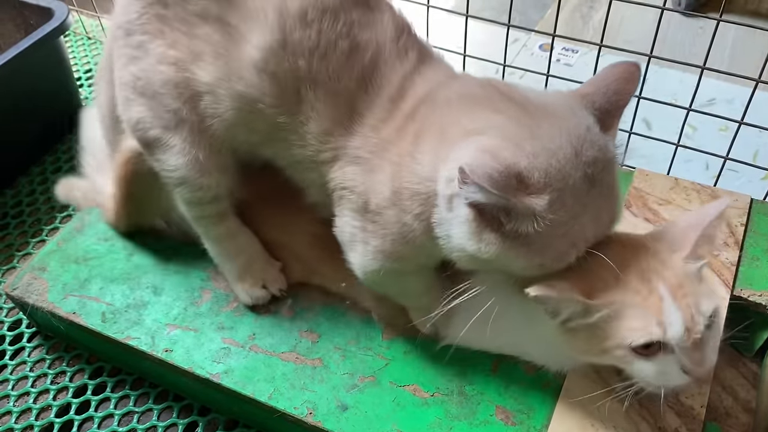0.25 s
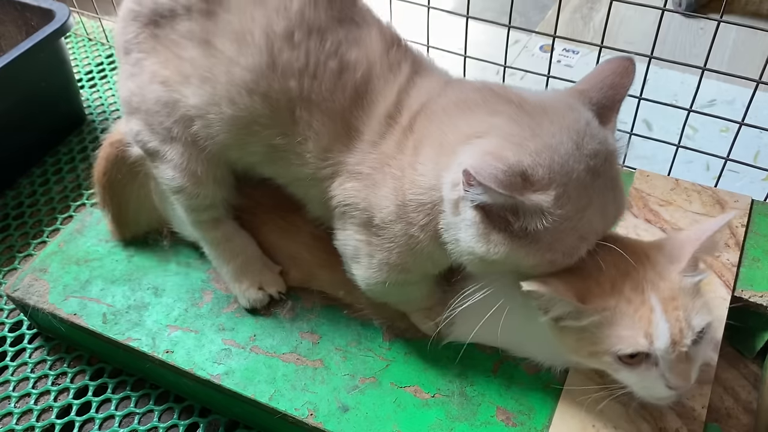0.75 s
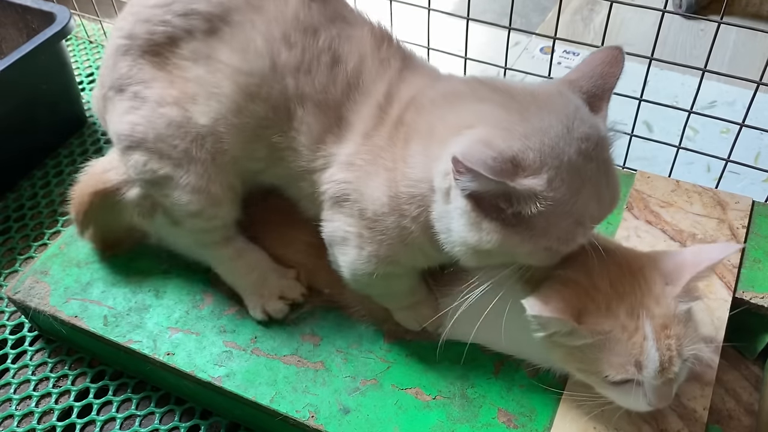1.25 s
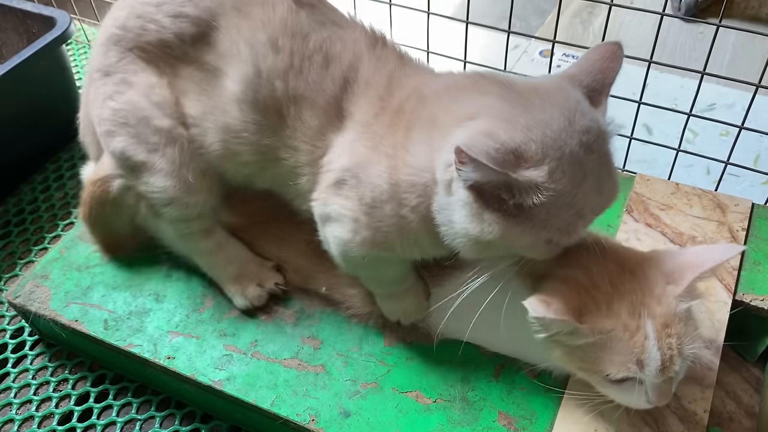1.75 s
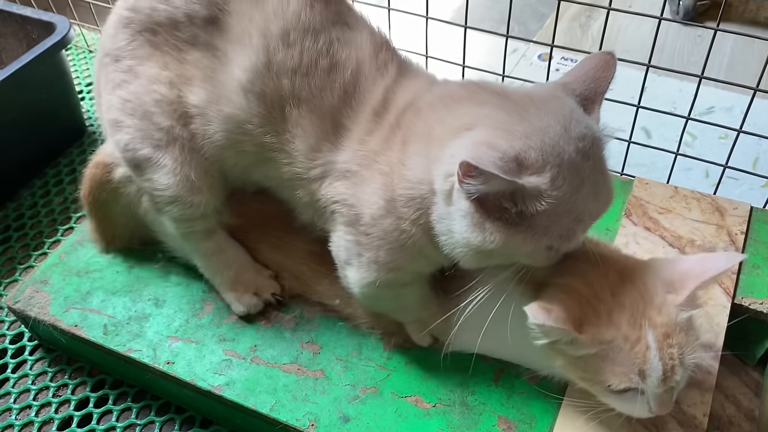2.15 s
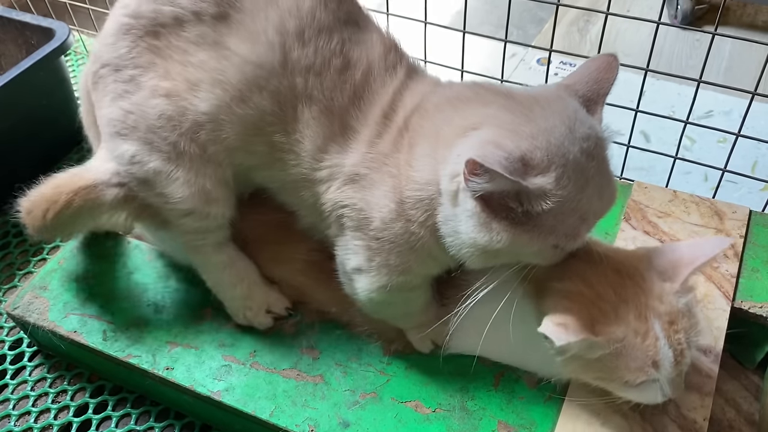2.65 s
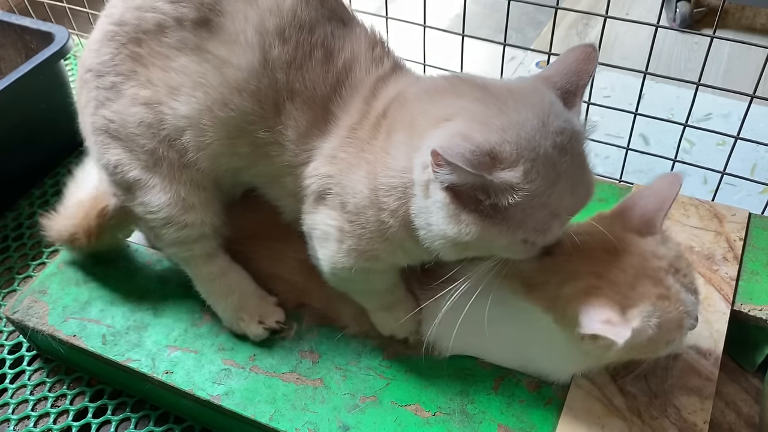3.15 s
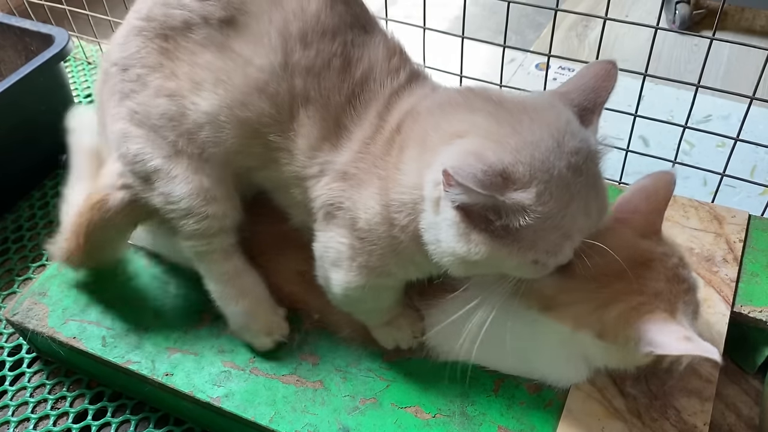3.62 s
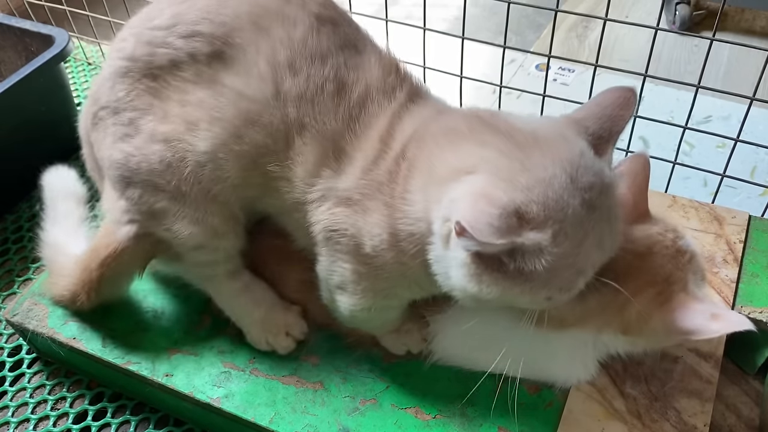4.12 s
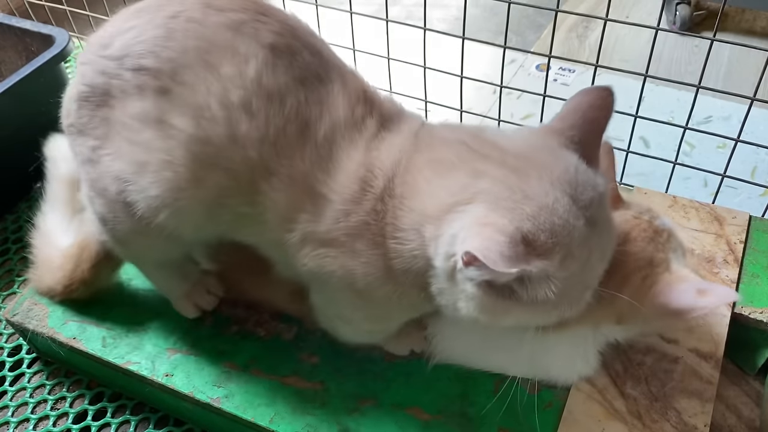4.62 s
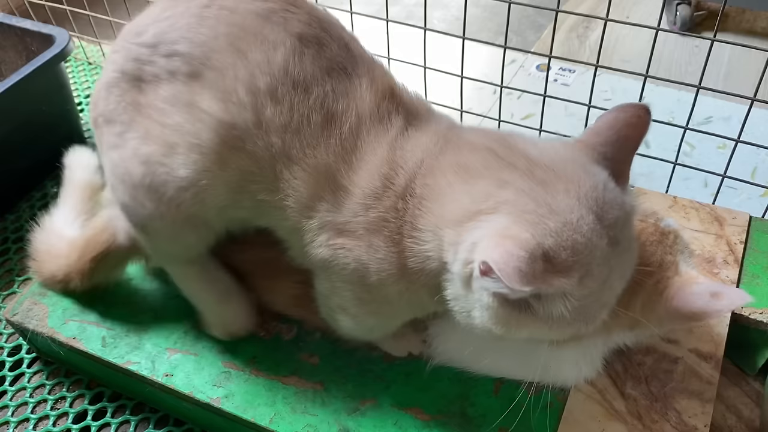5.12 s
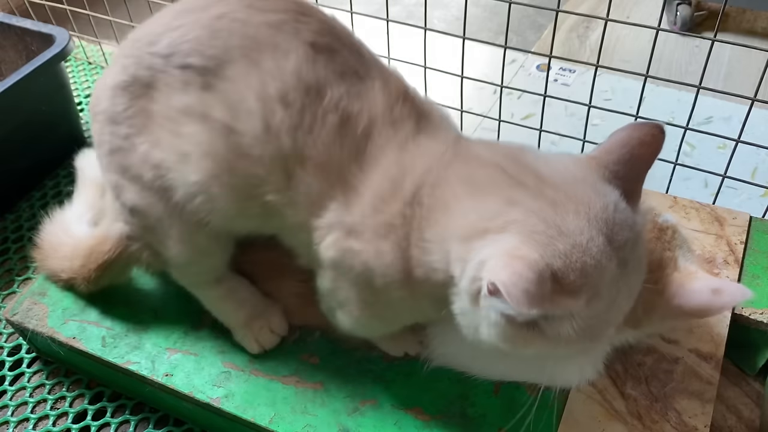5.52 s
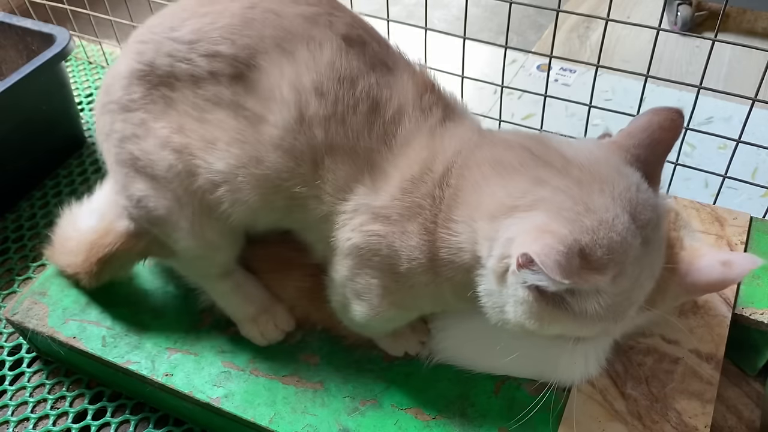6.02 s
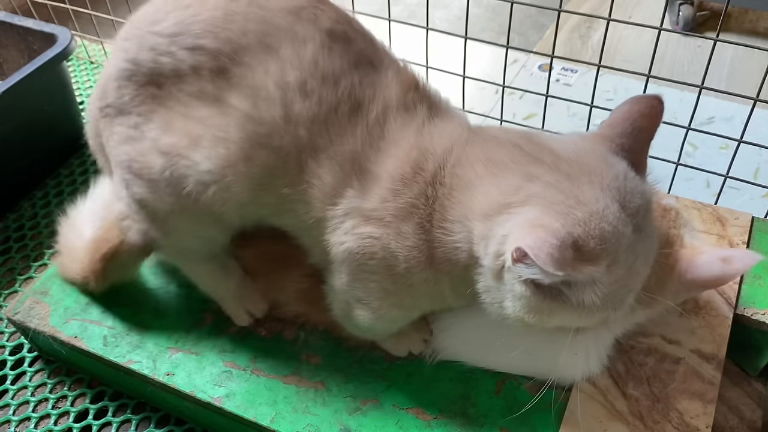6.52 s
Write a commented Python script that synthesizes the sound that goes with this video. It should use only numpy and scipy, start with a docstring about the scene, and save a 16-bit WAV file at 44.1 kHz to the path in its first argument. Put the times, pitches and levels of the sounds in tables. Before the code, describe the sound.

Close cat yowl cracks and falls, followed by a rough two-part cry, quiet rattling trills, claw clicks on board, moan and growl over low hum.

```python
"""Two cats in a wire cage

Two cats on a board, close to a phone with a microphone at each end. A yowl, a trill, a hoarse
double cry, another trill, and later a moan and a growl: pulses and breath through throat resonances.
Claws tick and drag as short noise bursts, and a faint squeak is narrow noise.
The room adds an echo made of sparse taps, shaped air noise and three fuzzy low tones.
"""
import sys
import numpy as np
from scipy import signal
from scipy.fft import rfft, irfft, next_fast_len
from scipy.io import wavfile
from scipy.ndimage import uniform_filter1d

SR = 44100
rng = np.random.default_rng(int(sys.argv[2]) if len(sys.argv) > 2 else 0)


def to_wav(s):
    """Save 16-bit WAV."""
    ch = np.atleast_2d(s).T  # columns
    pcm = np.round(np.clip(ch, -1, 1) * 32767)  # PCM
    wavfile.write(sys.argv[1], SR, pcm.astype(np.int16))


N = 298557  # length [samples]

# Color of the air noise: (frequency [Hz], relative level per Hz [dB])
AIR_COLOR = [(24, -53), (33, -23), (50, 3.5), (90, -3), (125, -3), (200, -6), (400, -14), (1000, -18),
             (2000, -22.5), (4000, -31), (5300, -31.5), (7000, -38.5), (11000, -42), (16000, -48)]
AIR_DB = -42
# Stereo shape of the hiss, whose bands alternate between in-phase and opposed channels:
# (frequency [Hz], strength of the alternation before a limit of 0.98 [factor])
AIR_STEREO = [(100, 0.92), (400, 0.89), (1000, 0.2), (2000, 0.067), (4000, 0.25), (5500, 0.048),
              (7000, 1.15), (16000, 4.5)]
STEREO_CYCLE_S = 0.0002768  # the bands repeat every 1 / this many Hz
# Low hum tones: (frequency [Hz], width [Hz], relative level [dB])
HUM_TONES = [(58.3, 4.4, -21), (85.3, 6.8, 1.5), (99.9, 12.3, -6.5)]
# Level of the low hum over time: (time [s], level [dB])
HUM_LEVEL = [(0.0, -38), (0.51, -50), (1.21, -42.5), (1.7, -51), (2.4, -45.5), (4.5, -45.5), (5.0, -43.5),
             (5.62, -43), (6.77, -39.5)]
# How long the echo rings, never under 0.05 s: (frequency [Hz], time to fall 60 dB [s])
ECHO_TIME = [(200, 0.77), (1000, 0.51), (2200, 0.67), (3600, 0.57), (6000, 0.54), (12000, 0.043)]
# How far the left microphone leads for nearby sounds: (frequency [Hz], phase lead [rad])
LEFT_LEAD = [(100, 0.012), (520, 0.41), (1030, 0.65), (1550, 1.1), (2070, 1.16), (2750, 0.56), (4500, 0.17),
             (5500, 3.6), (7400, 6.6), (9000, 11.9), (11000, 11), (13100, 16), (15000, 18.5)]
# How much louder the left microphone is: (frequency [Hz], left over right [dB])
LEFT_TILT = [(200, 0.5), (520, -3.5), (1030, 0), (1550, 1.5), (2500, -0.5), (4300, 3.5), (6000, 10),
             (7500, 0)]
EDGE_HZ = 15900  # top of the band
WIRE_HZ, WIRE_WIDTH_HZ, WIRE_DB = 2110, 16, -28  # one ring of the cage wire

SQUEAK_S, SQUEAK_LENGTH_S, SQUEAK_DB = 4.91, .2, -70
SQUEAK_HZ, SQUEAK_WIDTH_HZ = (4270, 4850), 220
# Claw drags: (start [s], rise [s], fall [s], ring [Hz], width [Hz], level [dB])
CLAW_DRAGS = [(.592, 0.014, 0.022, 6780, 1500, -46.5), (.612, 0.0081, 0.013, 4750, 716, -52),
              (0.643, 0.002, 0.0043, 5100, 1110, -47)]
# Claw ticks: (time [s], scratch gain [dB], gain on the board's knock [dB])
CLAW_TICKS = [(2.302, -48.5, -44), (2.59, -51, -55), (2.67, -46.5, -63), (3.42, -51.5, -68),
              (3.721, -38.5, -58), (3.7425, -40.5, -62), (3.7535, -50, -54), (4.5163, -35.5, -36),
              (4.5232, -42, -45), (4.5346, -36, -36), (4.617, -52, -50), (4.767, -41.5, -52),
              (4.7744, -45, -48), (4.788, -39, -62), (5.104, -52, -52), (6.2298, -50, -47)]
# Color of the scratch: (frequency [Hz], relative level per Hz [dB])
CLAW_COLOR = [(300, -22), (2000, -5), (3900, -3), (4450, -2.5), (5200, -2.5), (6300, -0.5), (6950, 1.5),
              (7700, -4), (10000, -9), (16000, -20)]
# Ringing tones of the board: (frequency [Hz], relative level [dB], time to fall 60 dB [s])
BOARD_TONES = [(472, 5.5, 0.069), (710, 0.5, 0.038), (1050, -7, 0.04), (1640, -3, 0.03), (2170, -5, 0.033),
               (2700, -10, 0.027)]

# Throat shapes, one resonance a row: (frequency [Hz], width [Hz], relative level [dB])
WIDE_THROAT = [(480, 170, -11), (1193, 290, -2), (1680, 430, 2), (2120, 230, 9.5), (2793, 62, -8),
               (3980, 520, -3.5), (4416, 370, -9.5), (4970, 780, -13.5), (5880, 300, -27),
               (7540, 1600, -22.5), (10540, 600, -14), (13900, 2900, -30)]
TIGHT_THROAT = [(260, 180, -5), (524, 140, -3), (1157, 360, 1), (1350, 230, 3), (1580, 184, 7),
                (2690, 470, -10.5), (3020, 260, -8.5), (7500, 470, -23), (11900, 830, -31)]
HOARSE_THROAT = [(522, 230, -5), (865, 77, -9), (1142, 380, 1), (1680, 330, -2), (2360, 320, -10.5),
                 (3940, 89, -23.5), (7470, 350, -32.5), (12260, 1300, -40)]
SHUT_THROAT = [(297, 180, 0), (523, 110, 9), (1045, 140, 2.5), (1340, 120, -2), (1660, 150, -11.5)]
DEEP_THROAT = [(162, 112, 1.5), (234, 61, 1.5), (344, 88, -2), (446, 50, 1.5), (517, 108, 2),
               (1050, 293, -9), (1620, 300, -16)]
PINCHED_THROAT = [(882, 130, -0.5), (1460, 110, -3), (2110, 180, -8)]
NASAL_THROAT = [(752, 52, -3.5), (881, 69, 11), (1520, 37, -12), (2020, 780, -6), (2350, 240, -22)]
# Chest resonances that keep the cry's lowest overtones clear:
# (frequency [Hz], width [Hz], relative level [dB])
CHEST = [(262, 320, -0.5), (483, 370, -1)]
CHEST_DB = -45.5  # at full effort
STRAIN_HZ = 2700  # resonances above this follow the strain
SHEEN_BAND_HZ = (6600, 9000)  # resonances here follow the sheen instead
SQUEAL_BAND_HZ = (4200, 6000)  # resonances at the back of the throat that can flare

# Growl: (time [s], pulse rate [pulses/s], effort [dB], roughness [0-1], mouth opening [factor])
GROWL = [(5.76, 75, -56, .15, .92), (5.8, 75, -44.5, .12, .99), (5.95, 74.5, -44.5, .12, 1),
         (6.05, 73, -46, .3, 1), (6.2, 73.4, -44, .4, 1.05), (6.34, 69, -46.5, .25, .97),
         (6.5, 71.3, -43, .2, 1), (6.6, 73, -43, .22, .98), (6.77, 76, -43.5, .3, .94)]
# Moan: (time [s], pitch [Hz], effort [dB])
MOAN = [(5.1, 265.7, -73), (5.18, 261.7, -44), (5.25, 271.3, -60), (5.3, 279.8, -46), (5.38, 303.5, -43.5),
        (5.45, 325.4, -42), (5.5, 304.7, -43), (5.58, 290.4, -41.5), (5.635, 271.5, -44.5),
        (5.67, 294.8, -45), (5.75, 289.6, -46), (5.8, 260, -68)]
# Two trills: (time [s], pulse rate [pulses/s], effort [dB], mouth opening [factor])
TRILLS = [
    [(1.36, 24, -57, 0.99), (1.45, 23, -48, 0.96), (1.7, 20, -54, 0.98)],
    [(2.3, 31, -55, 1), (2.37, 32, -48.5, 0.97), (2.46, 32.3, -45.5, 1), (2.495, 29.6, -51, 1),
     (2.54, 28.6, -42.5, 1.035), (2.575, 32, -45.5, 0.99), (2.612, 27, -53, 0.95), (2.65, 29, -46.5, 0.994),
     (2.755, 27, -50, 0.98), (2.785, 29, -54, 0.91), (2.87, 22.4, -51, 0.93), (3.05, 29, -59, 0.96)],
]
# Double cry, first half: (time [s], pitch [Hz], effort [dB], mouth opening [factor])
RASP = [(1.65, 271, -56, 0.74), (1.682, 256.4, -42, 0.77), (1.688, 251, -40, 0.87),
        (1.704, 245.2, -32.5, 0.91), (1.722, 238.7, -31.5, 0.99), (1.75, 260.3, -31, 0.98),
        (1.78, 288.3, -28.5, 1.03), (1.793, 287, -31.5, 0.97), (1.81, 286.6, -34.5, 0.97),
        (1.82, 290.4, -38, 1.02), (1.85, 304, -42, 1.03)]
# Double cry, second half: (time [s], pitch [Hz], effort [dB], mouth opening [factor])
CRY = [(1.84, 286.4, -43, .8), (1.88, 293.2, -37, 1), (1.95, 299, -32.5, 0.99), (2.02, 282.3, -33, 0.95),
       (2.05, 292.7, -34, 1.07), (2.09, 270.6, -32.5, 0.93), (2.125, 229.8, -38.5, 0.84),
       (2.16, 223, -41, 1), (2.25, 214.2, -40.5, 0.98), (2.32, 204, -61, 0.75)]
# Yowl: (time [s], pitch [Hz], effort [dB], roughness [0-1], mouth opening [factor],
# strain of the upper throat [dB], sheen near 7 kHz [dB])
YOWL = [(0, 439, -27.5, 0.33, 0.73, 1, -6), (.03, 486.6, -33.5, 0.1, 0.88, -8, -2),
        (.055, 522, -24, 0.09, 0.89, -4, -7), (.08, 519.3, -20, 0.08, 0.88, -0.5, -1.5),
        (.1, 530.2, -20, 0.06, 0.98, -5, -4), (.15, 543.7, -20.5, 0.05, 0.98, 4.5, 8),
        (.19, 558.7, -18, 0.06, .99, 5.5, 4.5), (.24, 576.5, -19, 0.05, 1, 7.5, 2),
        (.262, 567, -18, 0.07, 0.98, 4.5, 1), (.28, 555, -18, 0.04, 0.98, 2, 0.5),
        (.32, 531, -17, 0.04, 0.99, 0.5, -9), (.355, 516.7, -19, 0, 0.938, -8, -4),
        (.375, 497, -22, .05, 0.94, -2, 0), (.445, 456.6, -27, 0.08, 0.865, -5, 2),
        (.472, 415, -38, 0.1, 0.67, -34, -10), (.492, 372.8, -28, .15, 0.55, -11, -13),
        (.52, 304, -35.5, 0.25, 0.5, -14, -12), (.58, 248.6, -55, 0.12, .46, -18, -12)]
# Cracks in the yowl: (time [s], pitch loss before shaping [share], depth of the dip [dB])
CRACKS = [(.094, -.017, -3), (.195, .045, -6), (.219, .034, -2.5), (.24, .042, -2.5), (.253, .034, -6),
          (.292, .02, -1.5)]
CRACK_S, RECOVER_S, DIP_S = .002, .016, .004  # time constants: pitch slips, pitch returns, level dips
SQUEAL_S, SQUEAL_LENGTH_S, SQUEAL_DB = 0.337, .013, 13  # a short flare as the yowl starts down
FLARE_S, FLARE_LENGTH_S, FLARE_DB = .232, .04, 6  # a broader swell over the top of the yowl
PAIRED_S = (.196, .27)  # span where long and short cycles alternate most
FLUTTER_DB = .28  # each overtone wavers on its own, by this times its number


def amp(db):
    """Turns decibels into a gain."""
    return 10 ** (np.asarray(db) / 20)


def evened(x):
    """Scales a sound to an rms (average strength) of 1."""
    return x / np.sqrt(np.mean(x ** 2) + 1e-20)


def read_spectrum(points, hz):
    """Reads a (frequency, value) table, with straight lines on a log frequency axis."""
    f, value = np.transpose(points)
    return np.interp(np.log(hz + 1), np.log(f + 1), value)


def curves(rows):
    """Gives the time axis and the columns of a table, joined by straight lines."""
    s, *columns = np.transpose(rows)
    t = np.arange(s[0], s[-1], 1 / SR)
    return t, *(np.interp(t, s, c) for c in columns)


def add(mix, s, sound):
    """Mixes a sound in at s seconds."""
    part = mix[round(s * SR):][:len(sound)]
    part += sound[:len(part)]


def resonate(x, hz, width):
    """Shifts the frequency hz to zero, smooths twice, shifts back: a steep resonance of gain 1."""
    turn = np.exp(2j * np.pi * np.cumsum(hz * np.ones(len(x))) / SR)
    r = np.exp(-np.pi * width / SR)
    smooth = signal.lfilter([(1 - r) ** 2], [1, -2 * r, r * r], x / turn + 1e-18)
    return 2 * (turn * smooth).real


def pair(a, b, same):
    """Makes two channels from two unrelated spectra: same = 1 is in phase, -1 is opposed."""
    mid, side = np.sqrt((1 + same) / 2) * a, np.sqrt((1 - same) / 2) * b
    return np.array([mid + side, mid - side])


def air():
    """Steady colored room noise in stereo, with faint drifting patches."""
    f = np.fft.rfftfreq(N, 1 / SR)
    # plain stereo shaping: in-phase and opposed bands alternate, strongest in the treble
    same = np.clip(read_spectrum(AIR_STEREO, f) * np.cos(2 * np.pi * f * STEREO_CYCLE_S), -.98, .98)
    spectra = pair(*rfft(rng.standard_normal((2, N))), same)
    noise = irfft(spectra * amp(read_spectrum(AIR_COLOR, f)), N)
    # smooth random levels over time and frequency
    patches = rng.standard_normal((N // 128 + 5, 257))
    patches = uniform_filter1d(patches, size=20, axis=0)
    patches = evened(uniform_filter1d(patches, size=8, axis=1)).T
    z = signal.stft(noise, nperseg=512, noverlap=384)[2]
    z = z * amp(1.2 * patches[:, :z.shape[2]])
    return amp(AIR_DB) * evened(signal.istft(z, nperseg=512, noverlap=384)[1][:, :N])


def hum():
    """Low room hum: noise through narrow resonances gives three fuzzy tones that waver at random."""
    tones = sum(amp(db) * evened(resonate(rng.standard_normal(N), hz, w)) for hz, w, db in HUM_TONES)
    s, db = np.transpose(HUM_LEVEL)
    return amp(np.interp(np.arange(N) / SR, s, db)) * evened(tones)


def room(x):
    """Echoes as sparse taps of random sign, each frequency band dying at its own speed."""
    taps = np.zeros((2, SR))
    at = np.arange(400, SR - 20, 20) + rng.integers(0, 20, (2, (SR - 401) // 20))
    np.put_along_axis(taps, at, rng.choice([-1., 1.], at.shape), 1)
    hz, t, z = signal.stft(taps, SR, nperseg=256)
    t60 = np.maximum(read_spectrum(ECHO_TIME, hz), .05)
    tail = signal.istft(z * amp(-60 * t / t60[:, None]), SR, nperseg=256)[1]
    return signal.fftconvolve(x[None], tail / np.linalg.norm(tail[0]), axes=1)[:, :N]


def ports(x):
    """Direct sound at the two microphones: half the lead and half the tilt goes to each."""
    size = next_fast_len(N + 4096)
    hz = np.fft.rfftfreq(size, 1 / SR)
    half = np.exp(.5j * read_spectrum(LEFT_LEAD, hz)) * amp(.5 * read_spectrum(LEFT_TILT, hz))
    return irfft(rfft(x, size) * np.array([half, 1 / half]), size)[:, :N]


def squeak():
    """A faint thin squeak: two fuzzy high whistles of narrow noise swell and fade together."""
    noise = rng.standard_normal(round(SQUEAK_LENGTH_S * SR))
    tones = sum(evened(resonate(noise, hz, SQUEAK_WIDTH_HZ)) for hz in SQUEAK_HZ)
    out = np.zeros(N)
    add(out, SQUEAK_S, amp(SQUEAK_DB) * tones * signal.windows.tukey(len(noise), .5))
    return out


def scrapes():
    """A claw drags over the board: noise swells in one resonance and dies."""
    out, t = np.zeros(N), np.arange(4096) / SR
    for s, rise, fall, hz, width, db in CLAW_DRAGS:
        noise = rng.standard_normal(4096)
        shape = np.minimum(t / rise, 1) ** 2 * np.exp(-np.maximum(t - rise, 0) / fall)
        add(out, s, amp(db) * shape * evened(resonate(noise, hz, width)))
    return out


def claws():
    """Each tick is a short scratch of noise plus a knock that rings the board's tones."""
    out, t = np.zeros(N), np.arange(4096) / SR
    knock = sum(amp(db - 60 * t / t60) * np.sin(2 * np.pi * hz * t) for hz, db, t60 in BOARD_TONES)
    knock = knock * (1 - np.exp(-(t / 0.0024) ** 2))  # the paw lands just after the claw
    color = amp(read_spectrum(CLAW_COLOR, np.fft.rfftfreq(4096, 1 / SR)))
    # quick start, fast fall and a weak longer tail
    shape = (1 - np.exp(-(t / .001) ** 2)) * (np.exp(-t / .003) + .2 * np.exp(-t / .024))
    for s, db, knock_db in CLAW_TICKS:
        scratch = evened(irfft(rfft(rng.standard_normal(4096)) * color))
        add(out, s, amp(db) * scratch * shape + amp(knock_db) * knock)
    return out


def fold_tone(t, turns, tilt, count, flutter_db):
    """The vocal folds' overtones, each with its own slow waver in level."""
    steps = rng.standard_normal((count, 60))  # one new value every 20 ms
    tone = 0
    for k in range(1, count):
        waver_db = flutter_db * k * np.interp((t - t[0]) * 50, np.arange(60), steps[k])
        tone = tone + k ** tilt * amp(waver_db) * np.cos(2 * np.pi * k * turns)
    return tone


def throat_sound(drive, throat, mouth, jaw_hz, strain_db, squeal_db, sheen_db):
    """Sums the throat's resonances; the mouth moves those below jaw_hz."""
    voice = 0
    for f, width, db in throat:
        if SHEEN_BAND_HZ[0] < f < SHEEN_BAND_HZ[1]:
            db = db + sheen_db
        elif f > STRAIN_HZ:
            db = db + strain_db
        if SQUEAL_BAND_HZ[0] < f < SQUEAL_BAND_HZ[1]:
            db = db + squeal_db
        moved_hz = f * (mouth if f < jaw_hz else 1)
        voice = voice + amp(db) * resonate(drive, moved_hz, width)
    return voice


def call(t, hz, effort_db, throat, rough, jitter, shimmer_db, paired, throb_hz, throb_db, breath,
         count, mouth=1, strain_db=0, squeal_db=0, sheen_db=0, jaw_hz=SR, soft=0, hiss=0, wander=0,
         flutter_db=0, size=6000):
    """Vocal-fold pulses, uneven in time and size, and puffs of breath pass the throat."""
    rough = np.clip(rough, 0, 1)
    wobble = evened(uniform_filter1d(rng.standard_normal(N), size=150))[:len(t)]
    # a restless tongue smears the resonances
    tongue = evened(uniform_filter1d(rng.standard_normal(N), size=900))[:len(t)]
    mouth = mouth * (1 + wander * tongue)
    turns = np.cumsum(hz * (1 + jitter * rough * wobble)) / SR
    # long and short cycles alternate, which adds tones between the overtones
    turns = turns + paired * rough ** 2 * np.cos(np.pi * turns)
    cycle = np.round(turns).astype(int)
    # a slower flap of tissue beats on the pulses
    throb = np.cos(2 * np.pi * (throb_hz * t + 0.11 * wobble))
    uneven_db = shimmer_db * rng.standard_normal(1000)[cycle] + throb_db * throb
    pulse = amp(rough * uneven_db)
    # weak effort closes the folds softly: weaker high overtones
    tilt = soft * (effort_db - effort_db.max()) / 20
    folds = pulse * fold_tone(t, turns, tilt, count, flutter_db)
    puffs = pulse * (0.92 + np.exp(-(turns % 1) / 1.2)) * rng.standard_normal(len(t))
    drive = (1 - breath * rough) * evened(folds) + breath * rough * evened(puffs)
    # air past the teeth, mostly treble
    drive = drive + hiss * evened(np.diff(puffs, 2, prepend=[0, 0]))
    voice = throat_sound(drive, throat, mouth, jaw_hz, strain_db, squeal_db, sheen_db)
    # even out the voice over `size` samples so that the effort sets its level
    level = np.sqrt(uniform_filter1d(voice ** 2, size=size) + 1e-12)
    return t[0], amp(effort_db) * voice / level * signal.windows.tukey(len(t), .04)


def growl():
    """Slow uneven pulses and breath in a deep throat."""
    t, rate, effort_db, rough, mouth = curves(GROWL)
    return call(t, rate, effort_db, DEEP_THROAT, rough, mouth=mouth, jitter=.26, shimmer_db=4.,
                paired=0, throb_hz=25, throb_db=1., breath=1, count=30, wander=.04)


def moan():
    """A soft breathy voice with few overtones through a nearly shut throat."""
    return call(*curves(MOAN), SHUT_THROAT, rough=.32, jitter=.1, shimmer_db=6., soft=.5, paired=.2,
                throb_hz=70, throb_db=9., breath=.75, count=9, wander=.015)


def trill(throat, rows):
    """Slow breathy pulses swell and fade while their rate and the mouth opening shift."""
    t, rate, effort_db, mouth = curves(rows)
    return call(t, rate, effort_db, throat, rough=.9, jitter=0.3, shimmer_db=1., paired=0,
                throb_hz=8.7, throb_db=0.5, breath=1, count=90, mouth=mouth, size=2500, wander=.012)


def rasp():
    """First half of the double cry: a tight throat and a strong, fast throb."""
    t, hz, effort_db, mouth = curves(RASP)
    return call(t, hz, effort_db, TIGHT_THROAT, rough=.54, jitter=.17, shimmer_db=4., paired=0,
                throb_hz=84, throb_db=8., soft=.7, breath=.42, jaw_hz=2500, count=44, mouth=mouth,
                wander=.02, size=2500)


def cry():
    """Second half of the double cry: hoarse folds and breath."""
    t, hz, effort_db, mouth = curves(CRY)
    return call(t, hz, effort_db, HOARSE_THROAT, rough=.55, jitter=.16, shimmer_db=5., paired=.07,
                throb_hz=95, throb_db=5., soft=.3, breath=.45, jaw_hz=2500, count=44, mouth=mouth,
                size=3000, wander=.025)


def cry_chest():
    """The cry's two lowest overtones, less rough, following its effort more gently."""
    t, hz, effort_db, _ = curves(CRY)
    chest_db = CHEST_DB + .35 * (effort_db - effort_db.max())
    return call(t, hz, chest_db, CHEST, rough=.36, jitter=.12, shimmer_db=5., paired=0,
                throb_hz=95, throb_db=3., breath=.3, count=3)


def yowl():
    """The long arching call: clear, strained at the top, its pitch cracking now and then."""
    t, hz, effort_db, rough, mouth, strain_db, sheen_db = curves(YOWL)
    squeal_db = SQUEAL_DB * np.exp(-((t - SQUEAL_S) / SQUEAL_LENGTH_S) ** 2)
    squeal_db = squeal_db + FLARE_DB * np.exp(-((t - FLARE_S) / FLARE_LENGTH_S) ** 2)
    at_top = 1. * (t > PAIRED_S[0]) * (t < PAIRED_S[1])
    paired = .5 + 1.8 * uniform_filter1d(at_top, size=300)
    pitch_loss, dips_db = 0, 0
    for at, share, db in CRACKS:
        since = np.maximum(t - at, 0)
        pitch_loss = pitch_loss + share * (np.exp(-since / RECOVER_S) - np.exp(-since / CRACK_S))
        dips_db = dips_db + db * np.exp(-((t - at - DIP_S) / DIP_S) ** 2)
    s, voice = call(t, hz * (1 - pitch_loss), effort_db, WIDE_THROAT, rough, jitter=.14, shimmer_db=8.,
                    paired=paired, sheen_db=sheen_db, throb_hz=45, throb_db=8., breath=.7, count=17,
                    mouth=mouth, strain_db=strain_db, squeal_db=squeal_db, soft=.9, hiss=.55,
                    flutter_db=FLUTTER_DB)
    return s, amp(dips_db) * voice


def cats():
    """Places every call at its own time."""
    out = np.zeros(N)
    for voice in (yowl, rasp, cry, cry_chest, moan, growl):
        add(out, *voice())
    for rows, throat in zip(TRILLS, (PINCHED_THROAT, NASAL_THROAT)):
        add(out, *trill(throat, rows))
    return out


def scene():
    """Cats and claws near the phone, their echo, and the room."""
    near = cats() + claws() + scrapes() + squeak()
    near = near + amp(WIRE_DB) * resonate(near, WIRE_HZ, WIRE_WIDTH_HZ)
    dull = signal.lfilter(*signal.butter(2, 5000, fs=SR), near)  # walls swallow the treble
    echo = amp(-13) * room(dull)
    return ports(near) + echo + air() + hum()


def record(dry):
    """Limits the band: a steep filter removes what lies above EDGE_HZ."""
    lowpass = signal.firwin(511, EDGE_HZ, window=("kaiser", 9), fs=SR)
    return signal.oaconvolve(dry, lowpass[None], "same")


dry = scene()
out = record(dry)
to_wav(out)
```